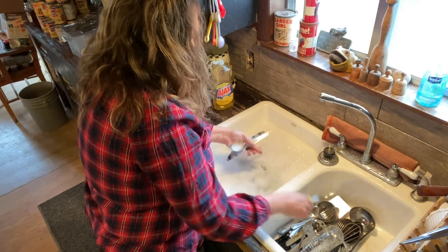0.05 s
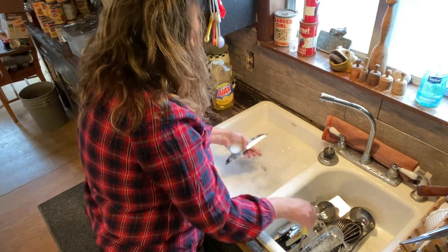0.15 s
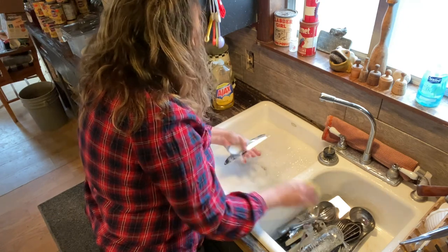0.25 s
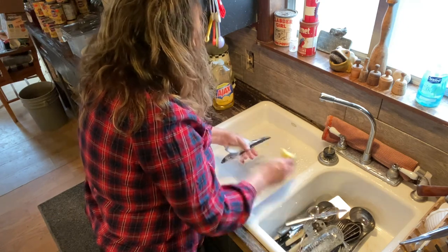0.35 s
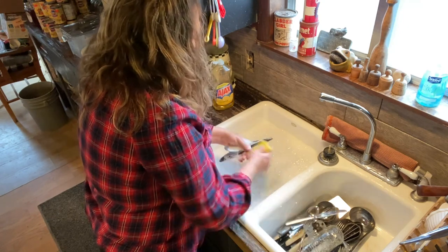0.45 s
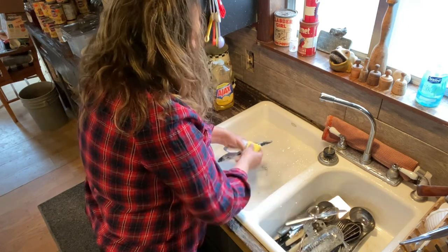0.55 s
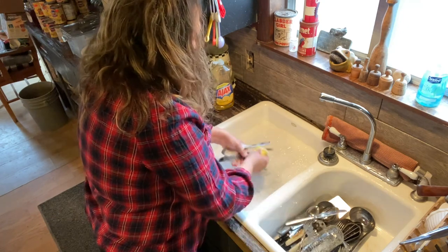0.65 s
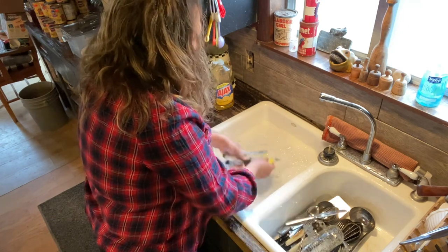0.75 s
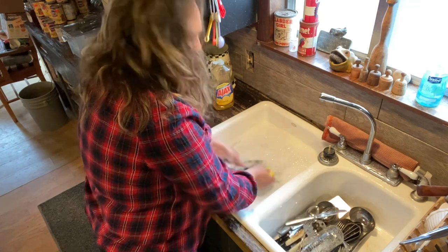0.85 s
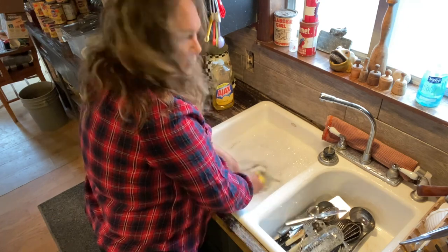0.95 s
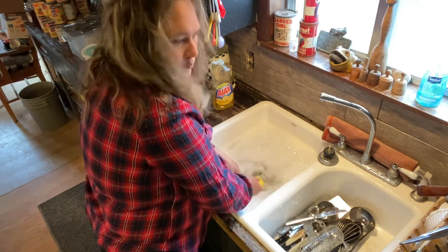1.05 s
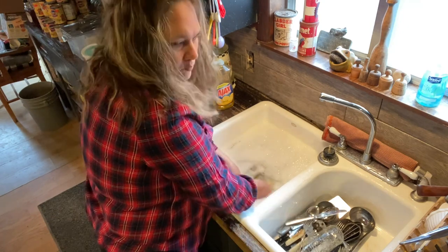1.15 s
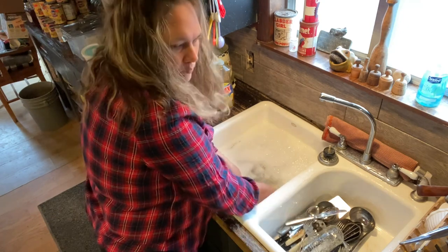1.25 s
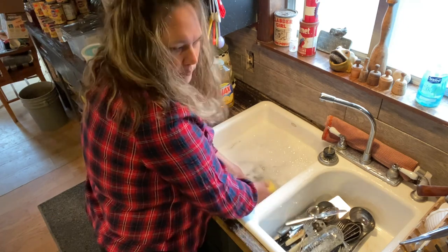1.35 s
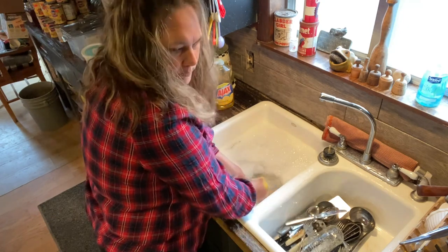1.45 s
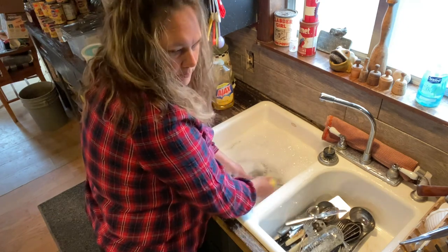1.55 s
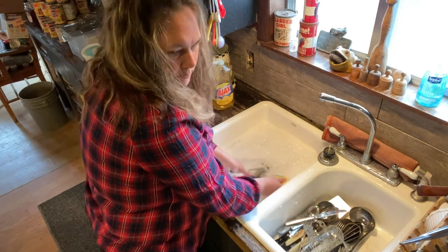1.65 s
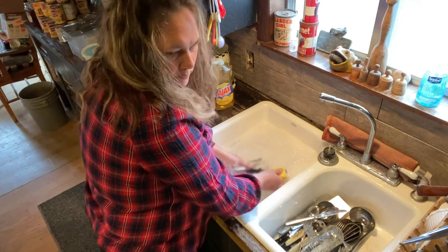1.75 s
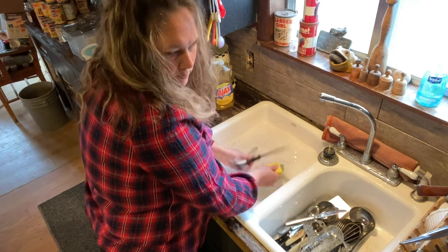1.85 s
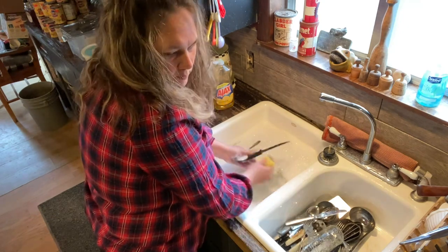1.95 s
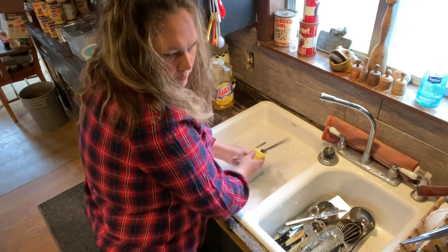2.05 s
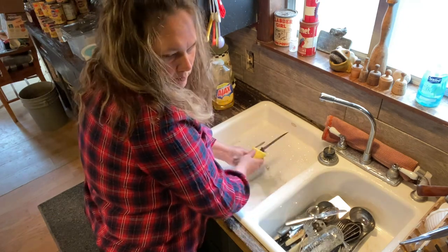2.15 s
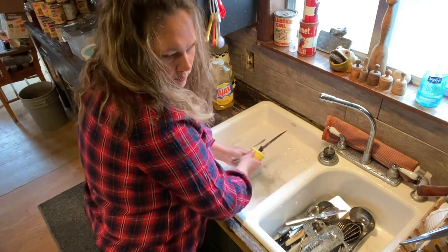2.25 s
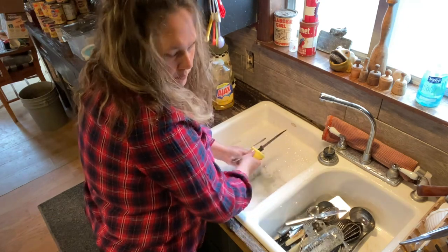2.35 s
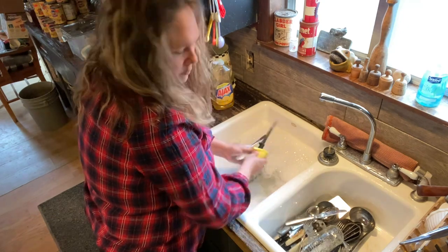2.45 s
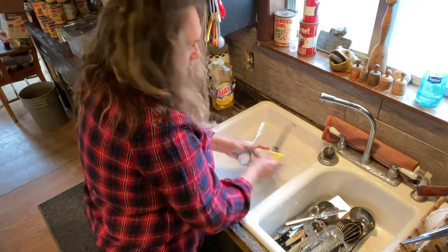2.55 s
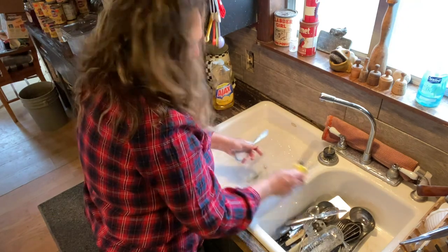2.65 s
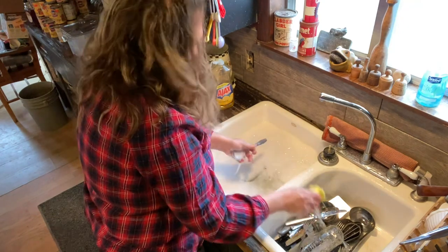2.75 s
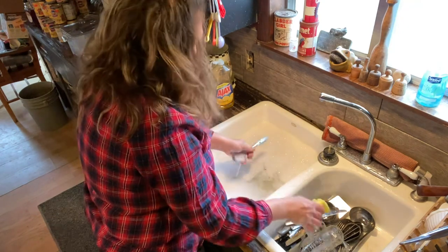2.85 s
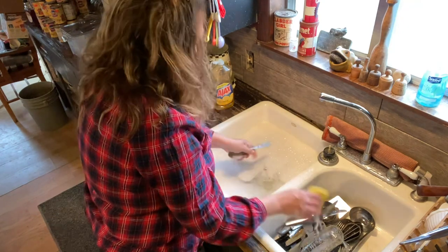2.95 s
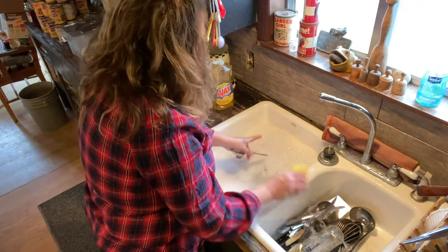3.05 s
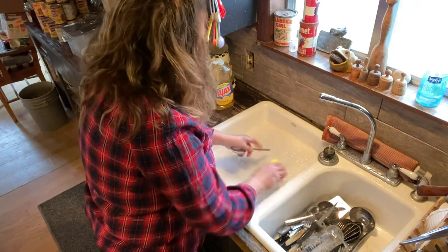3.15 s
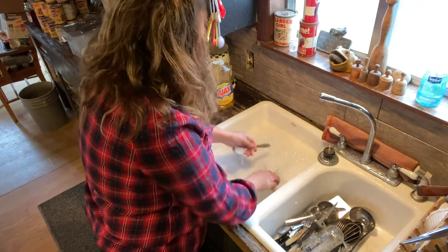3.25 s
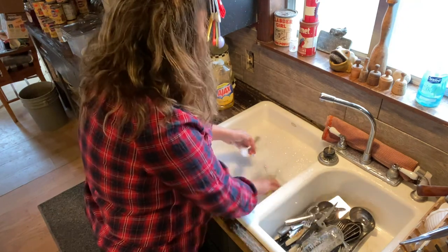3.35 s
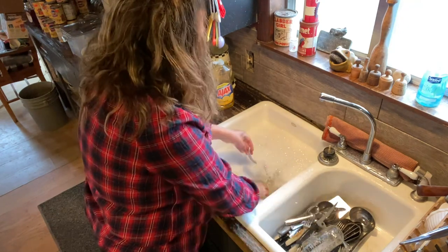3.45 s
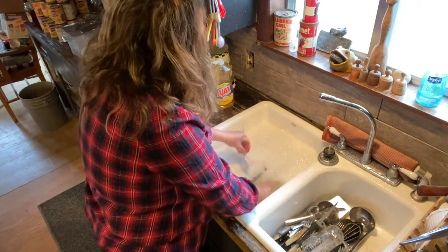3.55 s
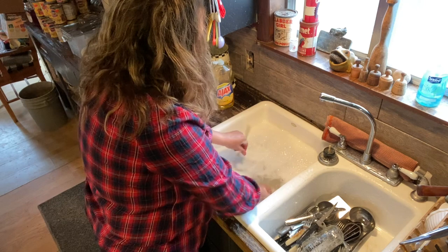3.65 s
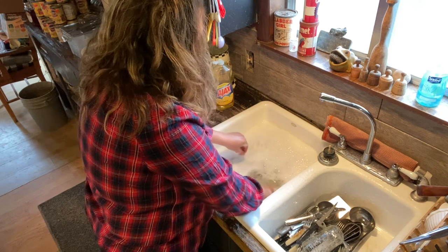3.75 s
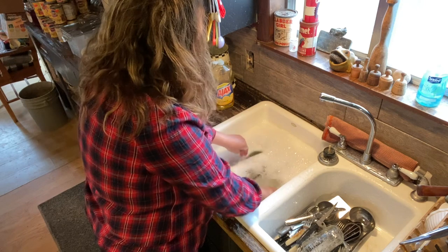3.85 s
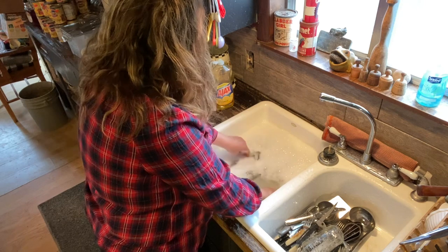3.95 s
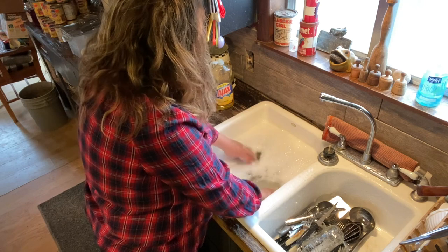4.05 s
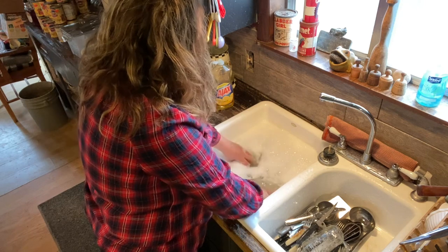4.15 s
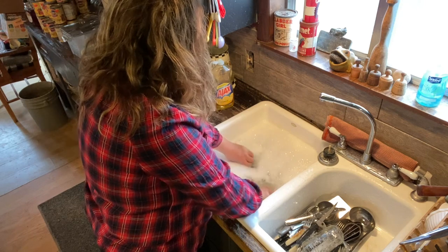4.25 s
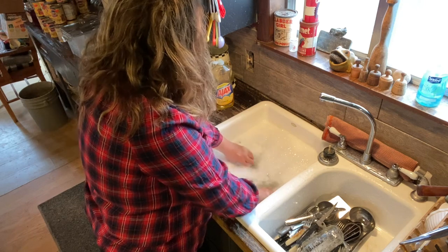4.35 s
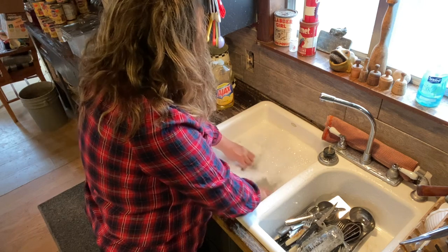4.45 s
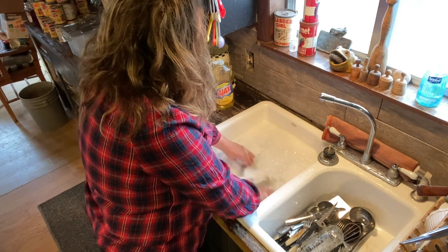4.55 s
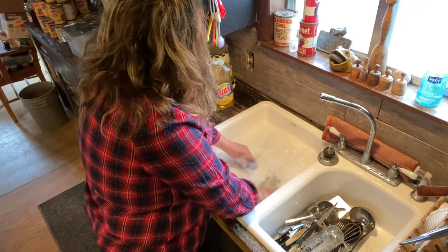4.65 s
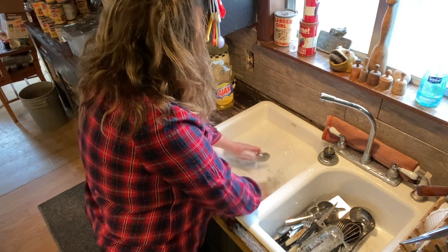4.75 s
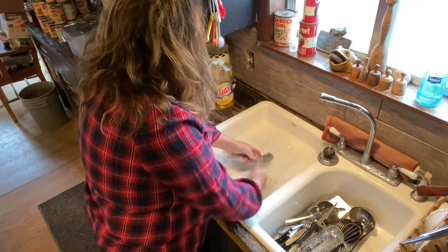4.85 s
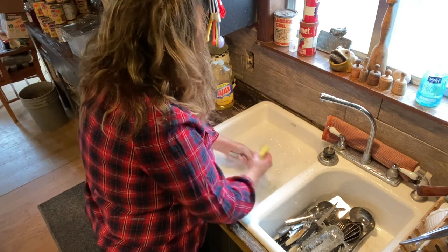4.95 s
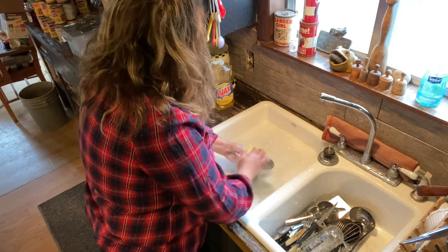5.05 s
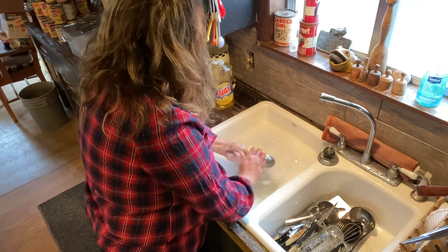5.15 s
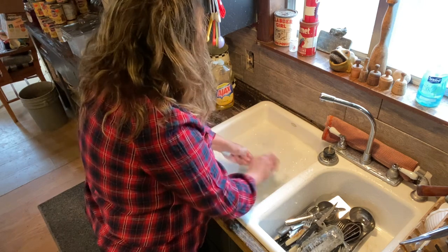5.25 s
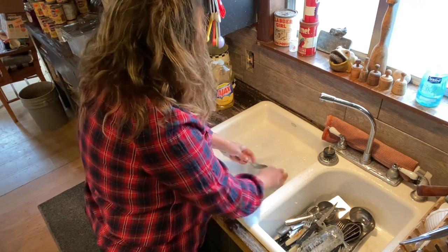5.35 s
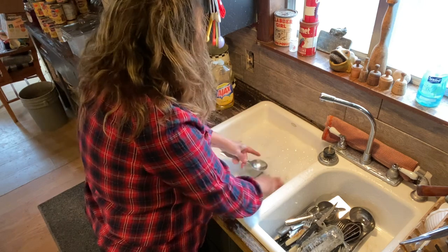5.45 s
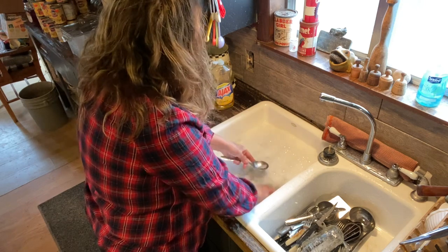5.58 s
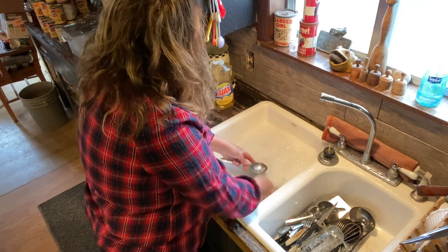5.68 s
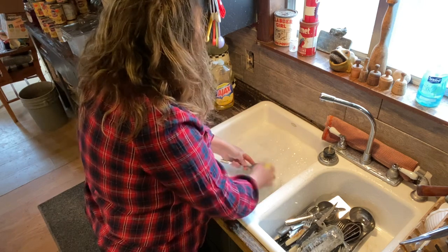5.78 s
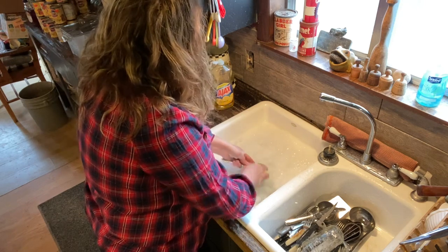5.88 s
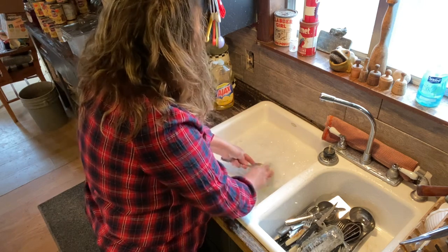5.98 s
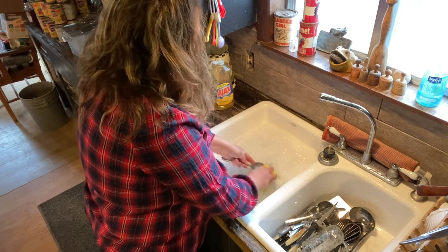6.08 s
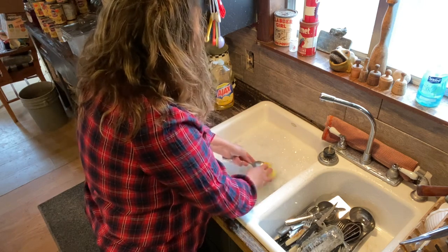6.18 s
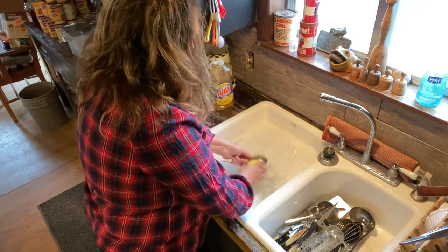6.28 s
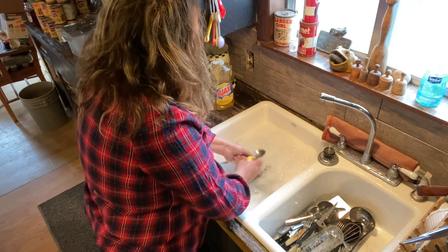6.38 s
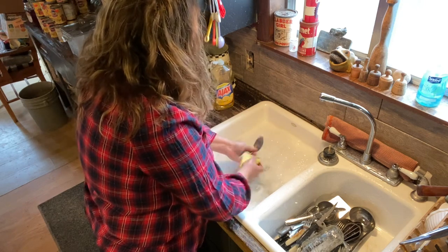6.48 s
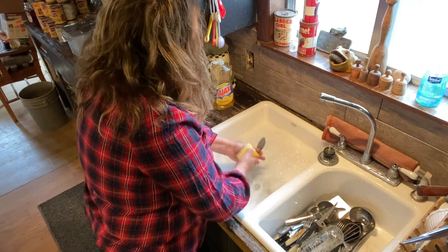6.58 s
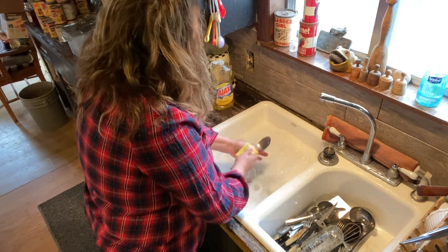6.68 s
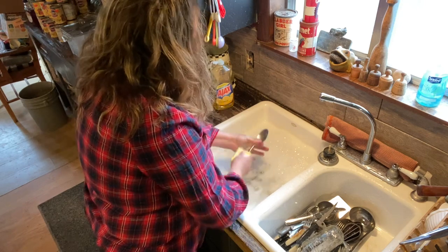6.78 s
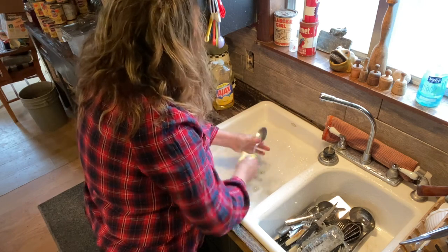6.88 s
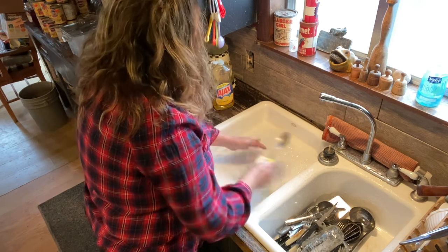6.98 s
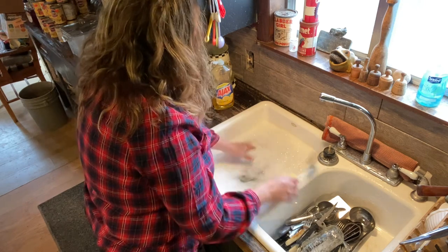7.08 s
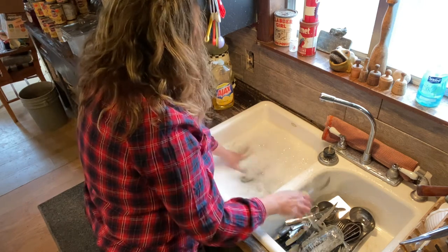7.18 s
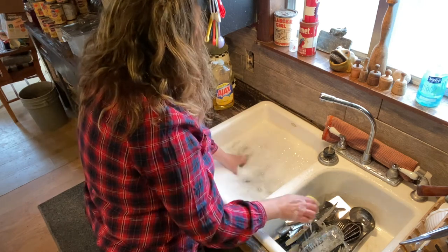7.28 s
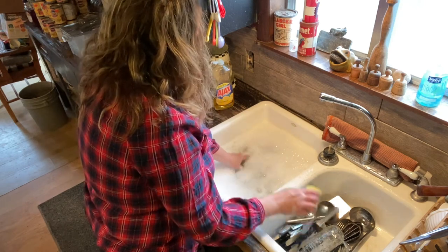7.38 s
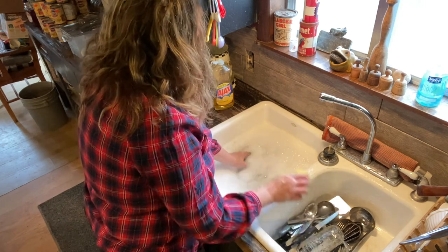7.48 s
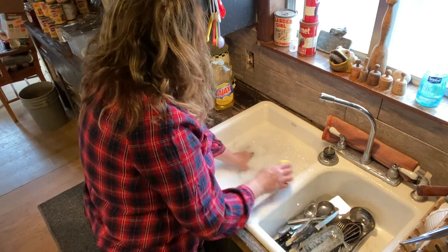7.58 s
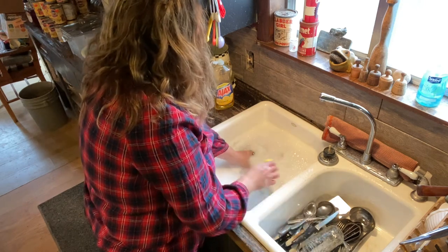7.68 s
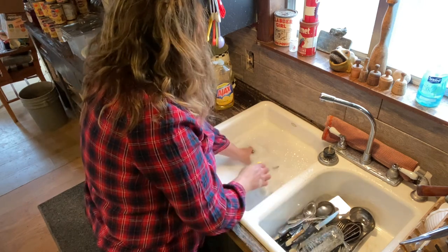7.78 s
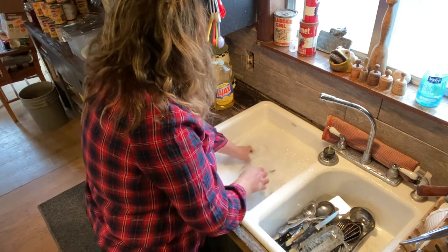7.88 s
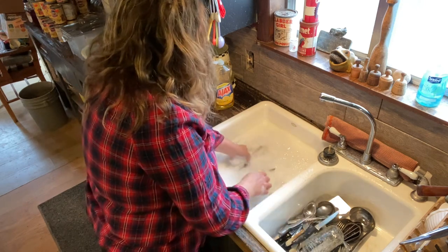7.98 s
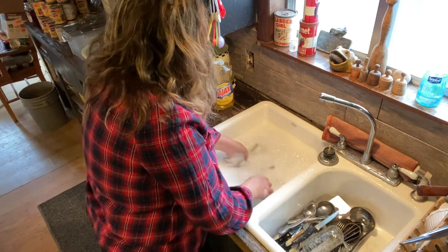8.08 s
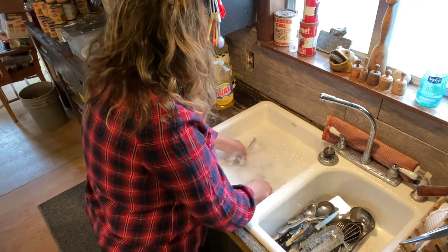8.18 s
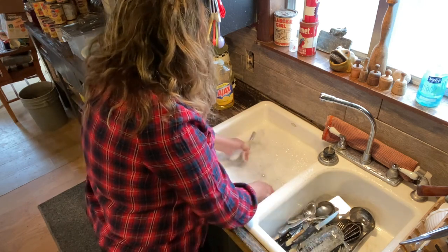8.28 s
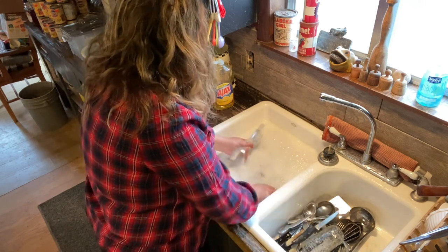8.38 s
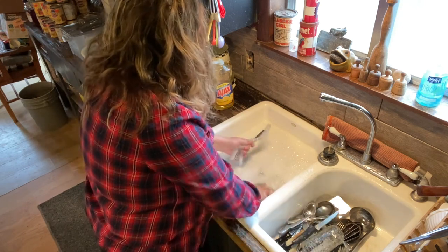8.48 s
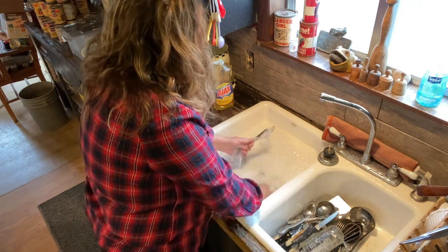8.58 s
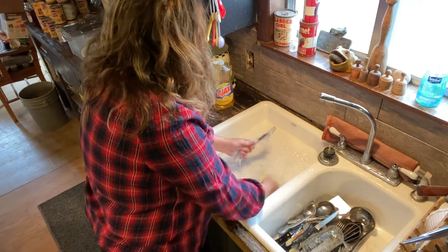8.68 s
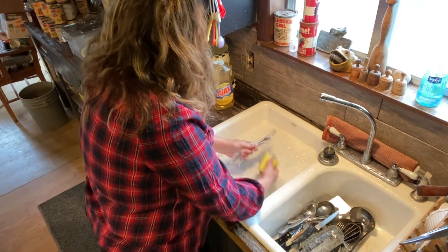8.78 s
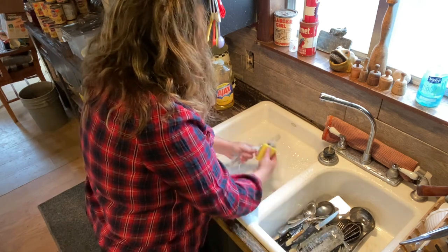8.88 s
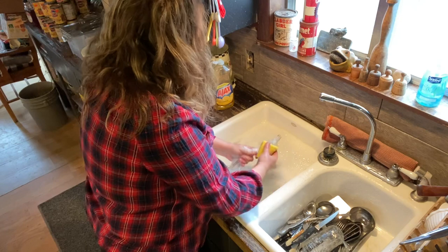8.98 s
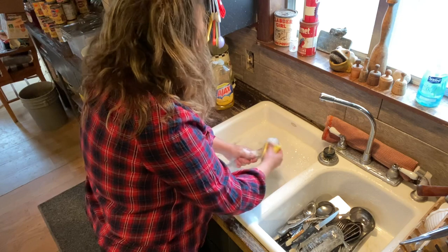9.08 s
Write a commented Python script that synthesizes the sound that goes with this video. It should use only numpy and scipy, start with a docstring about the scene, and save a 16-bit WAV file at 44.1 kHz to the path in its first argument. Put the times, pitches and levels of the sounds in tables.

```python
"""Washing cutlery in a double sink

Cutlery is washed by hand in an enamel double sink. Pieces drop on a ladle, a spoon, a knife and the dry
basin, or knock in the full one: noise crashes over decaying modes. Light touches sound single modes.
Water and drops are rising-pitch bubbles and shaped noise; the sponge and the suds are too.
A bumped cabinet thuds, a refrigerator hums in the room tone, and sparse decaying echoes form the kitchen."""
import sys
import numpy as np
from scipy import signal
from scipy.fft import rfft, irfft, next_fast_len
from scipy.io import wavfile

SR = 44100
rng = np.random.default_rng(int(sys.argv[2]) if len(sys.argv) > 2 else 0)


def persist_wave(psi):
    """Save psi, clipped to +-1, as 16-bit WAV."""
    counts = np.round(np.clip(psi, -1, 1) * 32767).astype(np.int16)
    wavfile.write(sys.argv[1], SR, np.atleast_2d(counts).T)


N = 402633

ROCK_DB = 3.4  # random level swing of a rocking piece


def gain_of(db):
    """Level to amplitude: 20 dB is a factor of ten."""
    return 10 ** (np.asarray(db) / 20)


def evened(x):
    """Normalization to unit mean power."""
    return x / np.sqrt(np.mean(x ** 2) + 1e-20)


def read(points, hz):
    """Linear interpolation of a spectrum on a logarithmic frequency axis."""
    f, value = np.transpose(points)
    return np.interp(np.log(hz + 1), np.log(f + 1), value)


def add(mix, s, sound):
    """Superposition: a sound joins the mix at s seconds."""
    part = mix[round(s * SR):][:len(sound)]
    part += sound[:len(part)]


def coloured(x, points):
    """Linear filtering: the spectrum is multiplied by a tabulated response in dB."""
    count = x.shape[-1]
    size = next_fast_len(count)
    response = gain_of(read(points, np.fft.rfftfreq(size, 1 / SR)))
    return irfft(rfft(x, size) * response, size)[..., :count]


def flicker(per_s, size):
    """Slow random modulation: Gaussian knots of unit deviation joined by straight lines."""
    knots = rng.standard_normal(400)
    return np.interp(np.arange(size) * per_s / SR, np.arange(len(knots)), knots)


def room_tone():
    """Stationary noise and narrow-band refrigerator lines, drawn independently for two channels."""
    # Spectrum of the air noise. Each row: frequency in Hz, relative density in dB per Hz
    air = [(20, -34.5), (40, -0.5), (52, 1.5), (100, 0), (200, -12), (315, -4), (500, -13.5), (1000, -20.5),
           (2200, -26), (4000, -29.5), (8000, -42.5), (16000, -49.5)]
    # Refrigerator lines. Each row: frequency in Hz, width of the wandering part in Hz, nominal level in dB
    hum = [(145.1, 7, -55), (289.6, 69, -63.5)]
    out = gain_of(-55) * evened(coloured(rng.standard_normal((2, N)), air))
    t = np.arange(N) / SR
    for hz, width_hz, db in hum:
        pole = np.exp(-np.pi * width_hz / SR)
        real, imaginary = signal.lfilter([1 - pole], [1, -pole], rng.standard_normal((2, 2, N)))
        wander = real + 1j * imaginary
        deviation = np.std([real, imaginary])
        envelope = wander / deviation * 0.71 + 1.016  # a wandering part and a steady part
        out += gain_of(db) * (envelope * np.exp(2j * np.pi * hz * t)).real
    return out


def kitchen(x):
    """Reverberation: sparse echoes of random sign decay by band, through three tail pairs in rotation."""
    # Decay of the room. Each row: frequency in Hz, reverberation time t60 in seconds
    decay = [(200, 0.3), (1000, 0.23), (4000, 0.19), (12000, 0.11)]
    walls_db, walls_t60 = 8, .03  # first echoes off basin and tiles: dB over the tail at its start, s
    taps = np.zeros((3, 2, SR // 2))
    at = np.arange(110, SR // 2 - 20, 20)
    at = at + rng.integers(0, 20, (*taps.shape[:2], len(at)))
    np.put_along_axis(taps, at, rng.choice([-1., 1.], at.shape), 2)
    hz, t, bands = signal.stft(taps, SR, nperseg=256)
    fade = gain_of(-60 * t / read(decay, hz)[:, None]) + gain_of(walls_db - 60 * t / walls_t60)
    tail = signal.istft(bands * fade, SR, nperseg=256)[1]
    tail /= np.linalg.norm(tail[0, 0])
    # the signed weights keep constant power while they turn, so the echo colour keeps changing
    phase = 4 * np.arange(N) / SR + np.arange(3)[:, None, None] / 3
    turns = np.sqrt(2 / 3) * np.cos(np.pi * phase)
    return signal.oaconvolve(x * turns, tail, axes=2).sum(0)[:, :N]


def cabinet():
    """Modal response of a panel: a soft push, here by a hip, excites two decaying wooden modes."""
    # Wooden modes. Each row: frequency in Hz, relative level in dB, decay time t60 in seconds
    wood = [(117, -1, .18), (290, -10, .12)]
    # Pushes. Each row: start in seconds, level in dB
    bumps = [(1.052, -31)]
    out, t = np.zeros(N), np.arange(SR // 2) / SR
    body = sum(gain_of(db - 60 * t / t60) * np.sin(2 * np.pi * hz * t) for hz, db, t60 in wood)
    for s, db in bumps:
        add(out, s, gain_of(db) * body * np.minimum(t / 0.018, 1))
    return out


def bubble(hz, cycles=13.0, rise=0.23):
    """Bubble resonance: a decaying sine whose pitch climbs as the bubble nears the surface."""
    u = np.arange(round(3 * cycles / hz * SR)) * hz / SR / cycles
    wave = np.sin(2 * np.pi * cycles * (u + rise * u ** 2 / 2))
    return wave * np.exp(-2.5 * u) * np.minimum(8 * u, 1)


def grains(low_hz, high_hz, per_s, cycles, spread_db):
    """Random superposition: many small bubbles of 24 pitches, a few much louder."""
    at = np.flatnonzero(rng.random(N) < per_s / SR)
    size = gain_of(spread_db * np.minimum(rng.exponential(1, len(at)), 4))
    kind, out = rng.integers(0, 24, len(at)), np.zeros(N)
    for k, hz in enumerate(np.geomspace(low_hz, high_hz, 24)):
        shape = bubble(hz, cycles)
        chosen = kind == k
        where = at[chosen, None] + np.arange(len(shape))
        out += np.bincount(where.ravel(), (size[chosen, None] * shape).ravel(), N)[:N]
    return evened(out)


def water():
    """Bubble and turbulence noise: slosh, sponge and fizz follow the hands and sliding wet pieces."""
    # Hands in the water. Each row: time in seconds, nominal levels of slosh, sponge and fizz of suds in dB
    hands = [(0.0, -64, -61.5, -81), (0.691, -77, -101, -82), (1.001, -68, -66, -70.5),
             (1.571, -64, -65.5, -72), (1.9, -69, -71.5, -74.5), (2.18, -72.5, -67, -78.5),
             (2.802, -72, -91, -76), (3.299, -65.5, -68, -67.5), (3.75, -64.5, -76.5, -81.5),
             (3.938, -51.5, -56, -65), (4.42, -60.5, -61, -73), (4.6, -70, -87, -81),
             (4.95, -60.5, -66, -66), (5.441, -68, -66, -68.5), (5.82, -55, -69, -70.5),
             (6.049, -77, -66.5, -73), (6.301, -66, -68, -71), (6.5, -69.5, -82, -74),
             (7.07, -70.5, -75, -78.5), (7.599, -55, -45.5, -63.5), (7.76, -48, -46.5, -54.5),
             (7.9, -55, -48, -54.5), (8.44, -66, -61, -64), (8.85, -69.5, -71.5, -75),
             (9.13, -64.5, -60.5, -63.5)]
    # Wet pieces settling on the heap. Each row: loudest moment in seconds, level before the shares in dB
    slides = [(0.301, -39), (2.949, -49.5), (7.413, -34)]
    # What a slide adds to each layer. The row: shares of slosh, sponge and fizz in dB
    shares_db = (-21.5, -3, 4)
    # Spectra of slosh, sponge and fizz. Each row: frequency in Hz, filter gain in dB
    slosh_tone = [(200, -28), (370, -1), (700, 0), (1500, -5), (3000, -7), (6000, -25)]
    rub_tone = [(900, 2), (2300, 4.5), (3200, 6.5), (4600, 2.5), (5600, 3.5), (8000, -37)]
    fizz_tone = [(2500, -22), (5500, -3.5), (7500, -2.5), (10000, 3), (14000, -12.5), (16500, -25.5)]
    rise_db_s, fall_db_s = 185.5, 153.5  # a slide swells and dies, dB per second
    t = np.arange(N) / SR
    s, *levels = np.transpose(hands)
    slide = sum(gain_of(db + np.minimum(rise_db_s * (t - at), fall_db_s * (at - t))) for at, db in slides)
    slosh_gain, rub_gain, fizz_gain = (
        gain_of(np.interp(t, s, db)) + gain_of(share_db) * slide for db, share_db in zip(levels, shares_db))
    slosh = grains(300, 4000, 1000, 6., 4.) + .4 * rng.standard_normal(N)
    fizz = grains(3000, 15000, 3000, 2.5, 4.0) + .6 * rng.standard_normal(N)
    rub = grains(1000, 8000, 700, 2.5, 1.9) + 1.1 * rng.standard_normal(N)  # foam squeezed from the pores
    # random swings in dB: surge of the water, pressure of the sponge, bursts of the suds
    out = slosh_gain * gain_of(3. * flicker(25, N)) * evened(coloured(slosh, slosh_tone))
    out += rub_gain * gain_of(2.6 * flicker(30, N)) * evened(coloured(rub, rub_tone))
    out += fizz_gain * gain_of(5.5 * flicker(22, N) - 3) * evened(coloured(fizz, fizz_tone))
    return out


def drops():
    """Entrained-bubble resonance: each drop plinks and throws up three smaller, higher droplets."""
    # Drops. Each row: start in seconds, nominal level in dB, bubble frequency in Hz
    plinks = [(3.371, -36, 1040), (3.433, -34.5, 1680), (3.464, -28.5, 1700), (3.497, -25, 2350),
              (3.346, -43, 810), (3.504, -35, 1260), (3.519, -38, 1054), (3.548, -35, 1080),
              (3.557, -27, 1310), (3.563, -35, 670), (3.608, -31, 1090), (3.861, -15, 357),
              (3.916, -24, 414), (4.01, -26.5, 800), (4.03, -26, 354), (4.075, -30, 420), (4.052, -32, 410),
              (4.127, -33, 920), (4.157, -25.5, 673), (4.169, -33, 644), (4.198, -42, 586),
              (4.332, -37, 403), (4.419, -31, 400), (4.386, -30, 1020), (4.433, -29, 1130),
              (4.841, -27, 2760), (4.849, -28, 1760), (4.866, -19, 658), (4.895, -24.5, 627),
              (5.068, -29.5, 2800), (5.479, -31, 1670), (5.671, -35, 1450), (5.71, -35, 1730),
              (5.765, -36, 640), (5.792, -28, 1310), (5.869, -35, 1800), (5.882, -34, 2900),
              (5.888, -38, 660), (5.926, -38, 1000), (5.691, -35, 1470), (5.72, -25.5, 726),
              (5.733, -32, 385), (4.999, -31.5, 734), (5.28, -29, 2430), (5.784, -32, 1230),
              (5.83, -30, 1096), (6.013, -34, 1144), (6.582, -40, 3100), (6.843, -39, 2450),
              (7.688, -32, 280), (7.71, -20.5, 366), (7.892, -36, 292), (7.946, -22.5, 394),
              (9.027, -30, 1570)]
    spray_db, spray_s = -9, .025  # later droplets are weaker, to twice this many dB; longest delay
    out = np.zeros(N)
    for s, db, hz in plinks:
        add(out, s, gain_of(db - 5.5) * bubble(hz, 8.3, 0.14))
        for late, pitch in rng.random((3, 2)):
            droplet = bubble(hz + 400 + 1800 * pitch, 4.)
            add(out, s + spray_s * late, gain_of(db + spray_db * (1 + late)) * droplet)
    return out


def clinks():
    """Single-mode excitation: a decaying sine wobbles as the piece rocks, until a touch damps it."""
    # Light touches. Each row: start in seconds, level in dB, frequency in Hz, seconds until muted
    touches = [(.208, -33, 4340, 0.0086), (.222, -23, 2473, .075), (.298, -25.5, 2460, 0.032),
               (3.007, -17.5, 2420, 0.012), (3.03, -32.5, 677, 0.048), (3.088, -28.5, 680, 0.094),
               (3.075, -21.5, 2490, 0.017), (3.103, -36, 2410, 0.0084), (3.124, -37, 2430, 0.038),
               (3.777, -21.5, 2844, .045), (3.778, -28, 3830, .04), (3.818, -29, 2150, 0.042),
               (3.852, -16.5, 3570, 0.0067), (7.328, -21, 2870, 0.051), (7.395, -26.5, 1010, 0.0049),
               (7.422, -29, 689, 0.065), (7.59, -33.5, 2176, 0.021), (7.88, -45, 4120, .03),
               (7.936, -31.5, 2330, 0.0064), (7.948, -32, 2930, 0.012), (7.994, -40, 2980, 0.018),
               (8.099, -36, 1144, 0.033), (8.248, -49, 4180, 0.011), (8.287, -38, 2720, 0.0097),
               (8.289, -47, 1620, 0.052), (8.29, -50, 754, 0.055), (8.333, -38, 2720, 0.034),
               (8.335, -41, 2240, .05), (8.34, -45, 764, 0.037), (8.344, -41, 1640, .042),
               (8.562, -35, 3045, .012)]
    t60, rise_s, mute_db_s = .15, .0015, 2500
    out, t = np.zeros(N), np.arange(8192) / SR
    for s, db, hz, free in touches:
        wobble_db = ROCK_DB / 2 * flicker(170, len(t))
        level_db = db - 60 * t / t60 + wobble_db - mute_db_s * np.maximum(t - free, 0)
        add(out, s, gain_of(level_db) * np.minimum(t / rise_s, 1) * np.sin(2 * np.pi * hz * t))
    return out


def blows(table, blow, modes=()):
    """Impact excitation: rattling contacts make a decaying noise crash and strike the modes."""
    luck_spread_db, detune = 2., .012  # chance in each mode's strength and relative frequency
    out, t = np.zeros(N), np.arange(16384) / SR
    lumps_hz = np.geomspace(300, 16000, 40)
    crash_t60, rattle, free = blow
    rattle = max(rattle, 1e-3)
    if modes:
        hz, mode_db, ring_t60 = np.transpose(modes)
        fade = -np.log(1000) / ring_t60
    for s, db, low_db, high_db, *ring_db in table:
        tone = [(220, low_db - 15.5), (380, 2.8 * low_db + 1.0), (600, low_db + 0.5),
                (1100, low_db + 5.5), (2200, 0.25), (4700, 0.43 * high_db - 0.5),
                (7500, high_db), (14000, high_db - 3.0), (16500, high_db - 13.5)]
        # uneven contacts, under a millisecond each
        contacts = gain_of(3.0 * rng.standard_normal(len(t) // 32)).repeat(32)
        onset = np.minimum(0.02 + 2.3 * t / rattle, 1)
        shape = np.where(t < rattle, contacts * onset, 1)
        decay = gain_of(-60 * np.maximum(t - rattle, 0) / crash_t60)
        crash = rng.standard_normal(len(t)) * shape * decay
        # no two crashes excite the same short resonances of the heap
        lumps_db = 1.4 * rng.standard_normal(len(lumps_hz)) + read(tone, lumps_hz)
        sound = coloured(crash, tone[:1] + list(zip(lumps_hz, lumps_db)))
        if modes:
            # where the blow lands decides which modes speak
            luck, turn, shift = rng.standard_normal((3, len(modes)))
            struck_db = ring_db[0] - 6.5 + mode_db + 0.79 * read(tone, hz) + luck_spread_db * luck
            struck = gain_of(struck_db) * np.exp(3j * turn)
            # the modes shift with the way a piece lies
            exponent = fade + 2j * np.pi * hz * (1 + detune * shift)
            waves = np.exp(np.outer(exponent, t).astype(np.complex64))
            # the piece rocks, then a touch mutes it
            choke_db = ROCK_DB * flicker(85, len(t)) - 900 * np.maximum(t - free, 0)
            sound += (struck @ waves).real * np.minimum(t / rattle, 1) * gain_of(choke_db)
        add(out, s, gain_of(db - 1.0) * sound)
    return out


# In the sources below, each row of hits: start in seconds, nominal level in dB, tone settings in dB for
# below 1.5 kHz and above 6 kHz, and ring setting in dB (none for splashes).
# Each row of modes: frequency in Hz, relative level in dB, decay time t60 in seconds.
# Each contact: t60 of the crash in s, rattle in s (at least 1 ms is used), s until a touch mutes the ring.


def splashes():
    """Damped impact: splashes, dull knocks and the body of the cabinet bump are noise without modes."""
    # Hits and contact
    hits = [(1.013, -47.5, 10.5, -25), (1.04, -51, 11, -30), (2.4614, -49, -11, -6.5),
            (3.2799, -54, -8, 2.5), (3.3446, -49.5, 2, -7.5), (3.4979, -52.5, 4, 1.5),
            (4.0576, -47, 7, -16), (4.371, -38, -7, -17.5), (4.4353, -36.5, 4, -22.5),
            (4.4898, -30, -2, -23.5), (4.803, -45, -2, -27), (4.8263, -45.5, -4, -3.5),
            (4.838, -29.5, -5.5, -45), (4.8615, -34.5, 2.5, -29), (5.0838, -46, -15, -8),
            (5.4785, -42, 1.5, -14.5), (5.6521, -46, 5, -16.5), (5.883, -47.5, 2.5, 1),
            (6.6246, -48, -6.5, -16), (6.69, -49.5, -12, -13), (7.2035, -47, -5, -14),
            (7.2396, -38.5, -1, -15.5), (7.267, -33, -3, -27), (7.672, -26.5, -3, -18),
            (7.692, -24, -7, -22), (7.7095, -25, -3, -21.5), (8.241, -41, -18, -5.5), (8.42, -43.5, -28, 2),
            (8.4317, -53, -23, 2), (8.495, -40, -5, -9), (8.52, -44.5, 0.5, -6), (8.716, -45, -38.5, -5),
            (8.735, -41, -19, -3.5), (8.761, -42, -26.5, -3.5), (9.0549, -43, -12, -7)]
    contact = (0.027, 0.0045, 0)
    return blows(hits, contact)


def full_basin():
    """Plate modes under impact: pieces knock on the basin that holds water."""
    # Hits, contact and modes of the full basin
    hits = [(3.7748, -15.5, 1.5, -5.5, -5), (3.7854, -35, -24, -3, 9), (3.8194, -27, -11, -2, 9.5),
            (3.835, -25.5, 3, 2, -11), (3.8531, -21, 1, -3, -6.5), (3.9933, -33.5, -28, -15.5, -16),
            (4.156, -37, -3, -36, -20), (5.7174, -50, 8, -28, -4.5), (7.853, -23, -12, -25, -20),
            (7.875, -28.5, -12.5, -38, 0.5), (7.933, -36.5, -0.5, 1, -8), (7.9425, -21, -1.5, -13.5, -12),
            (8.0963, -28, -3.5, -7, -29), (8.1464, -33, -11.5, -7, -13), (8.286, -36, -12, -32, -20),
            (8.331, -31.5, -2, -16, -15)]
    contact = (0.031, 0.0032, 0.055)
    modes = [(395, -1, .12), (520, -6, .1), (720, -7, .1), (935, -1, .07), (1150, -5, .08), (2160, -8, .07),
             (2905, -8, .1), (3700, -8, .08), (4323, -7, .07), (5760, -4, .07), (7900, -8, .1)]
    return blows(hits, contact, modes)


def dry_basin():
    """Plate modes under impact: pieces drop on the dry basin, which rings briefly."""
    # Hits, contact and modes of the dry basin
    hits = [(0.1258, -15.5, -6, -1, -2.5), (0.1981, -20.5, -12, 0, -13.5), (0.3226, -15, -2, -1.5, -20),
            (0.3588, -23, -19, 0.5, -21), (2.9135, -12.5, -7.5, -10, -6), (2.977, -29.5, -2, 1.5, -9)]
    contact = (0.03, 0.003, 0.025)
    modes = [(930, -1, .05), (1080, -3, .06), (1350, -4, .05), (1650, 0, .07), (1900, -1, .07),
             (2105, 1, .08), (3250, -3, .06), (5900, -5, .05)]
    return blows(hits, contact, modes)


def knife():
    """Bar modes under impact: blows on a knife excite short, mostly high modes."""
    # Hits, contact and modes of the knife
    hits = [(1.0259, -29, -1, -13.5, -32), (1.1071, -29, -19, -13.5, 6), (1.3334, -37.5, -5, -21, -24),
            (1.4449, -27.5, -7, -16, -1), (1.5419, -31, -3, -22, -12), (1.5744, -33, -8, -26, -17)]
    contact = (0.0117, 0.0035, 0.067)
    modes = [(2073, -16, .03), (3849, -11, .03), (9000, 2, .1), (10900, -8, .1), (13800, -14, .06)]
    return blows(hits, contact, modes)


def spoon():
    """Bar modes under impact: blows on a spoon excite bright modes that are left free longer."""
    # Hits, contact and modes of the spoon
    hits = [(7.3222, -20, -7, 9, -12), (7.3405, -15, -7.5, 1, -13), (7.3499, -18.5, -17, 3.5, 2),
            (7.3855, -20.5, -5, 2, 7.5), (7.5847, -30.5, -8, 6.5, -0.5), (8.1735, -36.5, -12, 4.5, -28),
            (8.552, -47, -9.5, 4, -20), (8.5622, -37.5, -8, 2.5, -3), (8.584, -33.5, -16, -2, -18)]
    contact = (0.043, 0.00077, 0.23)
    modes = [(2902, -10, .1), (5281, -8, .12), (6100, -9, .12), (7009, -6, .09), (8050, -6, .09),
             (9075, -10, .25), (10400, -2, .15), (12820, -8, .2), (13900, -8, .15)]
    return blows(hits, contact, modes)


def ladle():
    """Shell modes under impact: blows on the ladle excite low and high modes together."""
    # Hits, contact and modes of the ladle
    hits = [(0.2054, -21.5, -2, -3, 6), (0.2184, -20, -21.5, -1, -8), (0.235, -23, -17, 2.5, -13),
            (0.3855, -25, -4, -5, -17), (3.003, -19, -5, 4, -7.5), (3.008, -22, -24, 0, 3),
            (3.03, -34, 3, -9, 7), (3.0644, -24.5, -13.5, -2.5, -5), (3.0754, -26, -5, -30, 5.5),
            (3.1134, -26, -3.5, 1, -39), (7.4094, -20.5, -17, -5, -17.5), (7.42, -34, -2, -12, -7)]
    contact = (0.041, 0.0054, 0.045)
    modes = [(682, -3, .3), (2452, -12, .15), (4210, -14, .08), (5460, -7, .14), (5745, -11, .3),
             (6430, -16, .2), (7660, 1, .14), (8200, -13, .15), (8670, -15, .2), (13545, -6, .12)]
    return blows(hits, contact, modes)


def stereo(near, far):
    """Two-channel reception: near sound is the same in both channels, the far field partly so and nearly one
    sound in the treble; the channels differ in phase and level."""
    # Coherence of the far field. Each row: frequency in Hz, left-right likeness from 0 to 1
    likeness = [(60, 0.86), (250, 0.76), (700, 0.33), (2500, 0.019), (5500, 0.0086)]
    # Level difference. Each row: frequency in Hz, left over right in dB
    left_db = [(60, -2.5), (200, -4), (400, -1), (740, -5), (1500, -1.5), (4000, -1), (9000, 0)]
    # Phase difference. Each row: frequency in Hz, lag of the left in half turns (negative: it leads)
    half_turns = [(0, 0), (1000, .3), (4500, 1.55), (5200, 1.1), (6000, .55), (6900, .22), (7500, .03),
                  (8500, -.04), (9000, -.35), (9800, -.97), (11100, -1.02), (12200, -1.95), (13400, -2.04),
                  (13900, -2.3), (14700, -3)]
    size = next_fast_len(N + 1024)
    hz = np.fft.rfftfreq(size, 1 / SR)
    same = np.clip(read(likeness + [(7300, .96)], hz), 0, 1)  # nearly one sound in the treble
    direct, (a, b) = rfft(near, size), rfft(far, size)
    lag = np.exp(-1j * np.pi * np.interp(hz, *np.transpose(half_turns)))
    tilt = gain_of(read(left_db, hz) / 2)
    left = (direct + same * a + np.sqrt(1 - same ** 2) * b) * lag * tilt
    right = (direct + a) / tilt
    return irfft(np.array([left, right]), size)[:, :N]


def scene():
    """Superposition of the direct sound at the sink, its reverberation and the room tone."""
    sink = cabinet() + splashes() + full_basin() + dry_basin() + knife() + spoon() + ladle()
    light, wet = clinks() + drops(), water()
    # light touches and drops deep in the basin hardly wake the room, the water a little more
    echo = kitchen(sink + gain_of(-8) * light + gain_of(-4) * wet)
    return stereo(sink + light + wet, gain_of(5) * echo + room_tone())


def record(dry):
    """Band limitation: a linear-phase low-pass at 16.2 kHz."""
    low_pass = signal.firwin(255, 16200, window=("kaiser", 9), fs=SR)
    return signal.oaconvolve(dry, low_pass[None], "same")


dry = scene()
out = record(dry)
persist_wave(out)
```